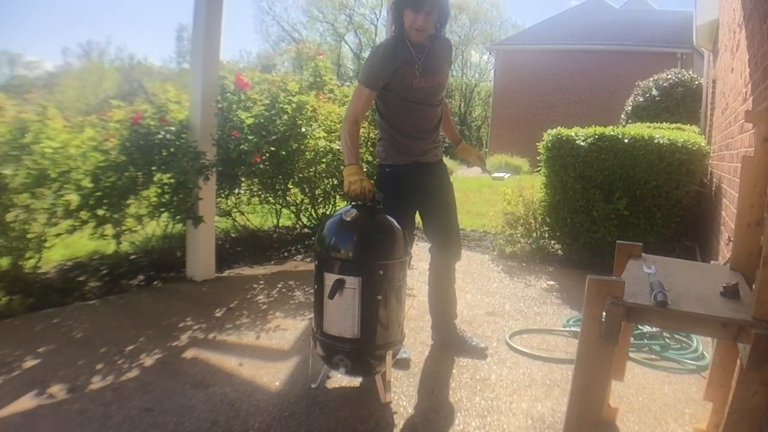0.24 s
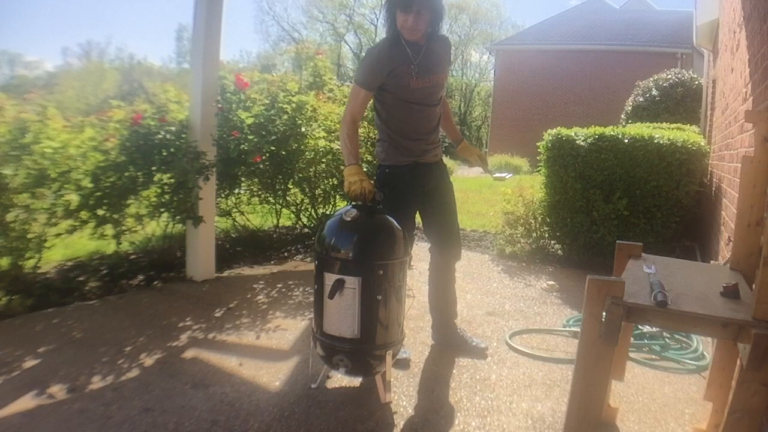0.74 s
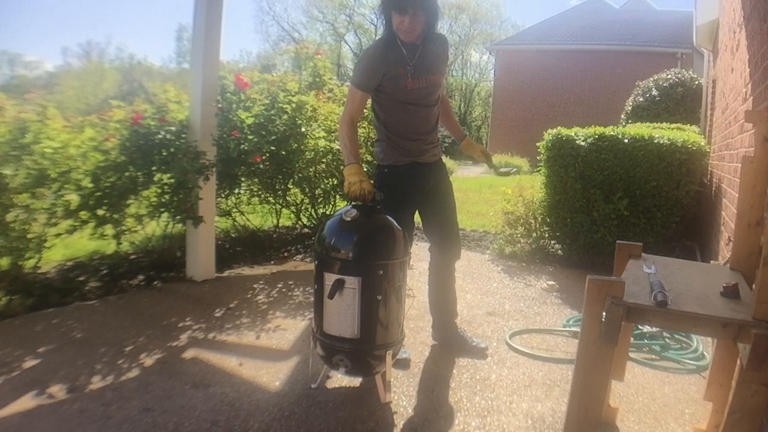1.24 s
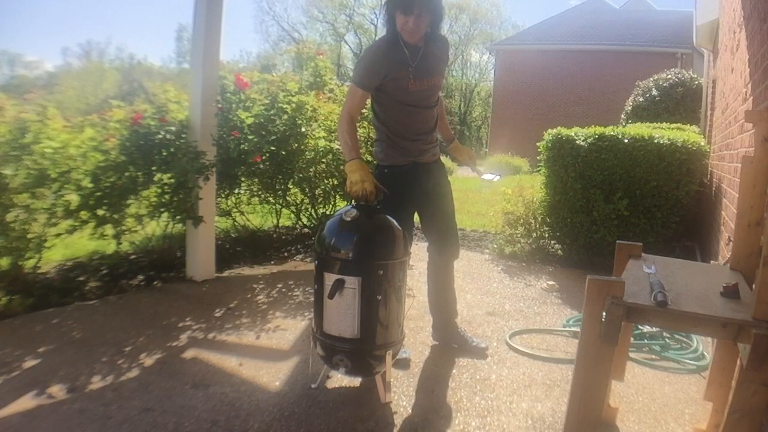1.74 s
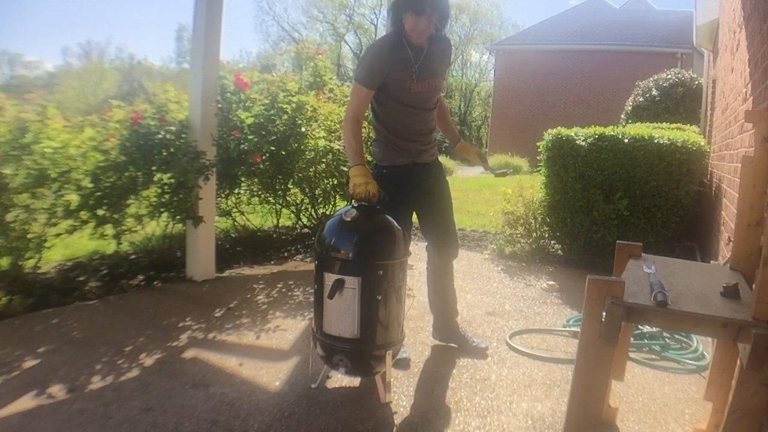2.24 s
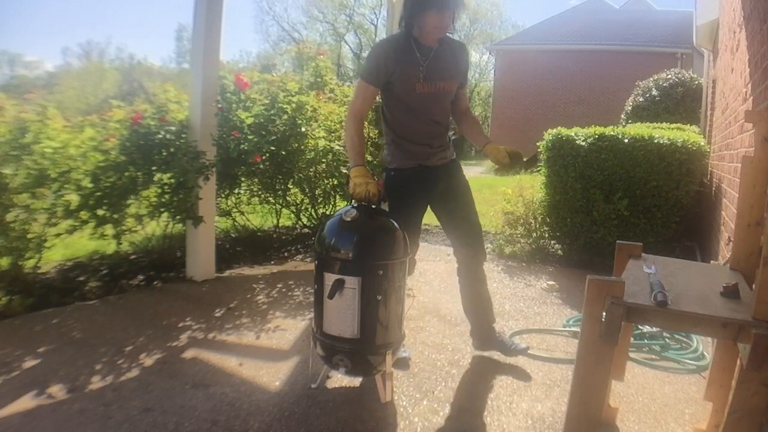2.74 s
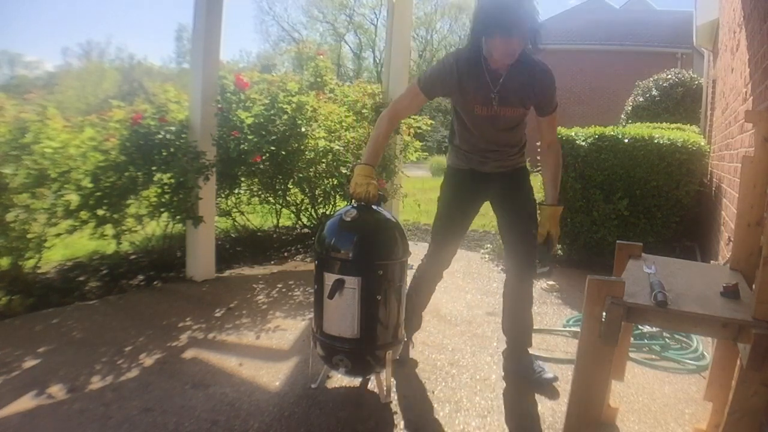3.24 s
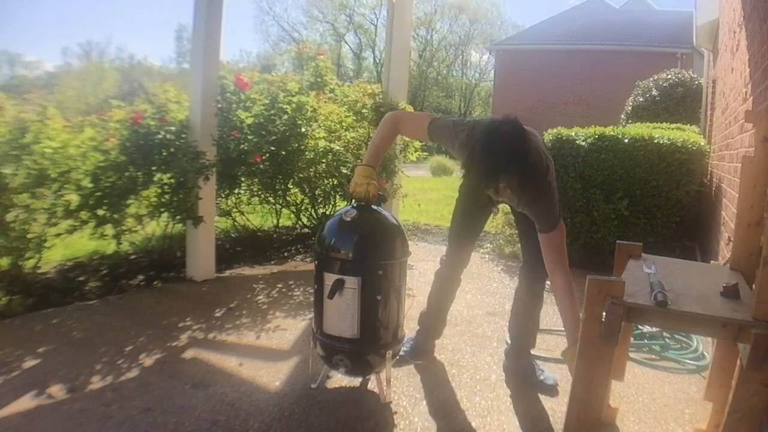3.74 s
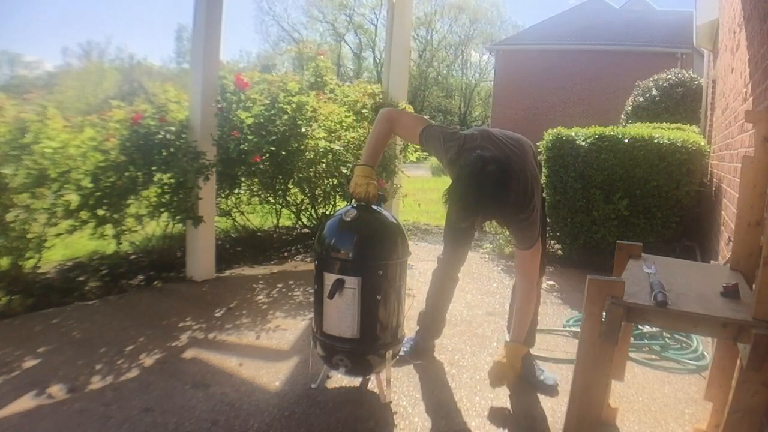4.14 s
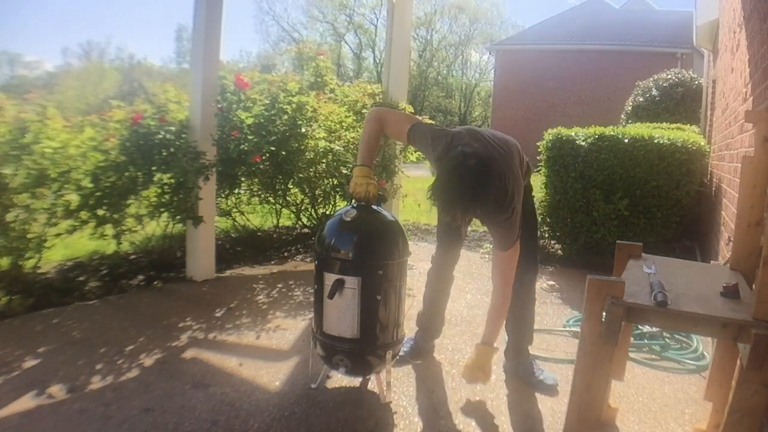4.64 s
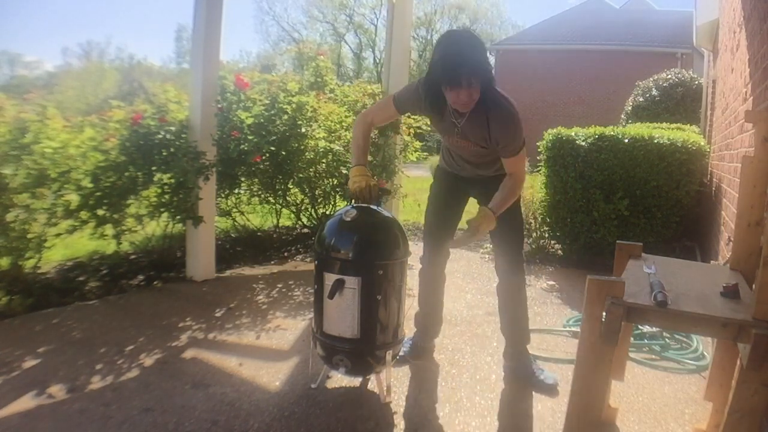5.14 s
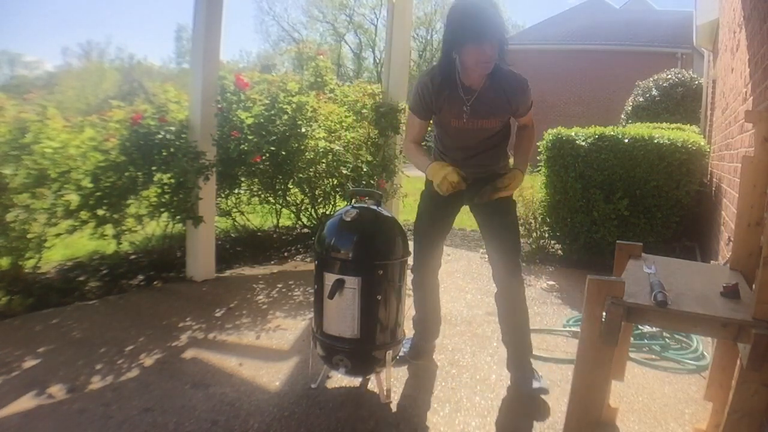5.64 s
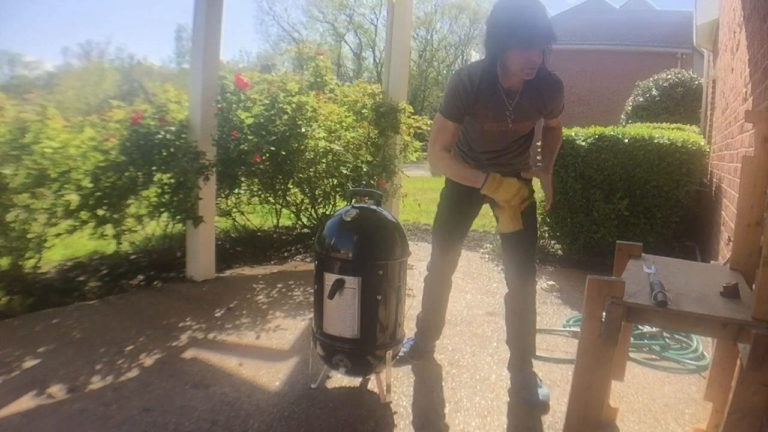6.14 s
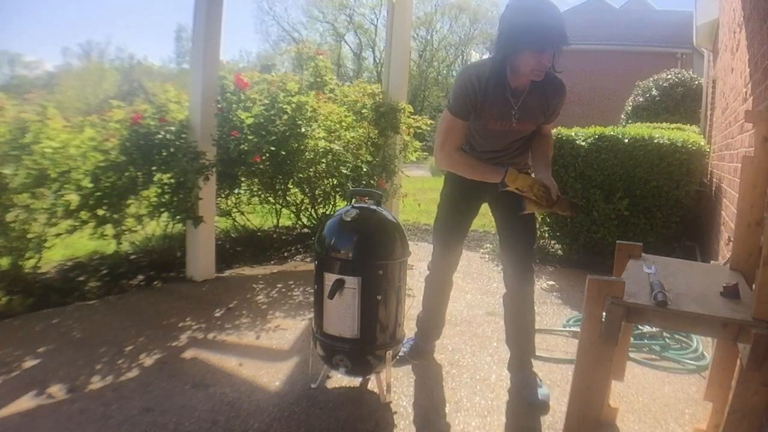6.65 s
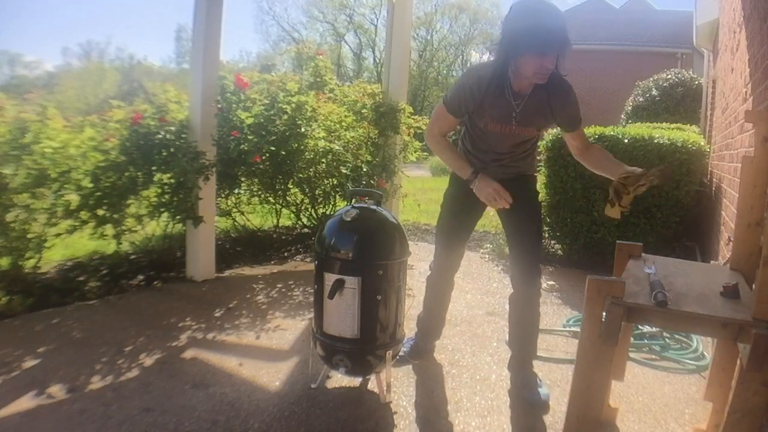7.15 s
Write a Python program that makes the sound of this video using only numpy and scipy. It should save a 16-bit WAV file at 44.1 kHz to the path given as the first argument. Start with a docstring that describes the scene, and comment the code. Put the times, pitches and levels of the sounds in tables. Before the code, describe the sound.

Outdoors on a covered patio, a low distant engine drone and soft air hiss run throughout. A dull foot thud comes early, then faint bird whistles. Around the middle a steel part of a charcoal smoker clanks sharply, bright and short, with a quick rattle. Birds chirp falling slurs afterward among faint glove and shoe scuffs. The microphone is fairly close, with short patio reflections.

```python
"""A soft outdoor hiss and the low drone of a far garden engine open the scene, with a faint fading whine.
Scuffs of shoes and gloves are friction grains; footfalls are a low push and a dull rumble.
Three birds sing in near sines: falling whistles, level pipes with a strong octave, and stepped slurs.
A steel part clanks on a charcoal smoker on a covered patio: noise cracks, ringing sheet modes and
hollow knocks, then a rattle of tiny contacts."""
import sys
import numpy as np
from scipy import signal
from scipy.fft import rfft, irfft
from scipy.io import wavfile
from scipy.ndimage import uniform_filter1d

SR = 44100
rng = np.random.default_rng(int(sys.argv[2]) if len(sys.argv) > 2 else 0)


def put_to_file(sound):
    """Save the sound as 16-bit audio at rate SR, in the file named by the first command-line argument."""
    columns = np.atleast_2d(sound).T  # one column per channel
    safe = np.clip(columns, -1, 1)
    whole_steps = np.round(safe * 32767)
    wavfile.write(sys.argv[1], SR, whole_steps.astype(np.int16))


N = 326295


def gain_of(db):
    """Decibels to a factor."""
    return 10 ** (np.asarray(db) / 20)


def evened(x):
    """Scales to rms 1."""
    return x / np.sqrt(np.mean(x ** 2) + 1e-20)


def coloured(x, points):
    """Filters x by a spectrum drawn on a log-frequency axis."""
    f, db = np.transpose(points)
    hz = np.fft.rfftfreq(len(x), 1 / SR)
    curve_db = np.interp(np.log(hz + 1), np.log(f + 1), db)
    return irfft(rfft(x) * gain_of(curve_db), len(x))


def add(mix, s, sound):
    """Mixes a sound in at s seconds, cut off at the end of the mix."""
    part = mix[round(s * SR):][:len(sound)]
    part += sound[:len(part)]


def resonate(x, hz, width_hz):
    """A resonance: shifts hz down to zero, smooths twice, and shifts back."""
    turn = np.exp(2j * np.pi * hz * np.arange(len(x)) / SR)
    r = np.exp(-np.pi * width_hz / SR)
    smooth = signal.lfilter([(1 - r) ** 2], [1, -2 * r, r * r], x / turn)
    return 2 * (turn * smooth).real


def drift(n, width_hz):
    """Random wander of rms 1: noise smoothed twice, faster for a larger width."""
    r = np.exp(-np.pi * width_hz / SR)
    return evened(signal.lfilter([1], [1, -2 * r, r * r], rng.standard_normal(n)))


def ring(modes, tilt_db, rise_s):
    """Dying sines in close pairs, since the shell is not quite round; each blow shares the energy anew."""
    t = np.arange(SR // 4) / SR
    partners = [(hz, db - 12.5, t60) for hz, db, t60 in modes]
    hz, db, t60 = np.transpose(modes + partners)[:, :, None]
    share, phase, split = rng.standard_normal((3, len(hz), 1))
    level_db = db + tilt_db * np.log2(hz / 2000) + 2 * share - 60 * t / t60
    sines = np.sin(2 * np.pi * (hz * (1 + 0.005 * split) * t + phase))
    return (gain_of(level_db) * sines).sum(0) * (1 - np.exp(-t / rise_s))


def echoes(t60, gap_s):
    """Sparse taps of random sign, dying away, energy 1."""
    at = np.arange(round(gap_s * SR), SR // 2, 20)
    taps = np.zeros(SR // 2 + 20)
    signs = rng.choice([-1., 1.], len(at))
    taps[at + rng.integers(0, 20, len(at))] = signs * gain_of(-60 * at / SR / t60)
    return taps / np.linalg.norm(taps)


# Colour of the outdoor air and microphone hiss. Each row: frequency in Hz, density in dB per Hz
# (only the shape counts).
AIR_COLOUR = [(25, -49), (45, -10), (70, -3), (125, -4.5), (190, -17), (260, -25.5), (500, -30),
              (1200, -30.5), (1500, -34.5), (3200, -37.5), (5000, -45), (6500, -42.5), (10500, -50.5),
              (12000, -49.5), (16000, -55.5)]
AIR_DB = -50  # rms level


def air():
    """Smooth noise of far traffic, leaves and the microphone."""
    return gain_of(AIR_DB) * evened(coloured(rng.standard_normal(N), AIR_COLOUR))


# The far engine's slow swells on the wind, before throb and fading.
# Each row: time in seconds, then second-, fourth- and eighth-order levels in dB.
DRONE_SWELLS = [(0, -52.5, -61, -57), (0.45, -56, -69, -67), (1, -57, -66, -69.5), (1.6, -53.5, -65, -76),
                (2.1, -53, -56, -66.5), (2.5, -51.5, -51, -68), (2.8, -52.5, -50, -62),
                (2.98, -51, -60, -58.5), (3.2, -50, -44.5, -57), (3.48, -52.5, -65, -61.5),
                (3.9, -48, -48.5, -62.5), (4.3, -54.5, -48, -59), (4.6, -47, -51.5, -65.5),
                (5.03, -52.5, -58, -67.5), (5.5, -45.5, -52.5, -62.5), (5.95, -46.5, -48.5, -62.5),
                (6.1, -55.5, -53.5, -71), (6.6, -46, -46.5, -65), (7, -48, -49, -62),
                (7.4, -48, -43, -71.5)]
# Weaker lines of the drone. Each row: frequency in Hz, level in dB, width in Hz.
WEAK_LINES = [(75.93, -56.5, 5.2), (91.6, -61, 21), (137.9, -56, 2.54), (163.8, -64, 2.55),
              (311.5, -78, 3.6), (344.4, -74, 4.8)]
ENGINE_HZ = 27.98
THROB_DB, THROB_HZ = 3.1, 17.4  # uneven firing
FADING_DB, FADING_HZ = 1.5, 2.7  # moving air makes each order fade in and out
# A tone just above the eighth order beats against it.
BEAT_HZ, BEAT_START_S, BEAT_SHARE = 5.9, 2.7, 0.74  # BEAT_START_S only sets the phase of the beat


def engine():
    """Orders of the firing rate; distance and wind blur each into a wavering line."""
    t = np.arange(N) / SR
    s, *levels_db = np.transpose(DRONE_SWELLS)
    turns = ENGINE_HZ * t + 0.018 * drift(N, 2.13)
    tones = [np.exp(2j * np.pi * order * turns) for order in (2, 4, 8)]
    beat = np.exp(2j * np.pi * BEAT_HZ * (t - BEAT_START_S))
    tones[2] = tones[2] * (1 + BEAT_SHARE * beat)
    out = np.zeros(N)
    for tone, db in zip(tones, levels_db):
        throb_db = THROB_DB * drift(N, THROB_HZ)
        fading_db = FADING_DB * drift(N, FADING_HZ)
        out += gain_of(np.interp(t, s, db) + throb_db + fading_db) * evened(tone.real)
    for hz, db, width_hz in WEAK_LINES:
        out += gain_of(db) * evened(resonate(rng.standard_normal(N), hz, width_hz))
    return out


WHINE_HZ, WHINE_WIDTH_HZ, WHINE_DB, WHINE_PULSE_DB = 1785, 114, -70, 1.6
WHINE_RISE_S, WHINE_HOLD_S, WHINE_FADE_DB_PER_S = 0.084, 0.82, 13  # the fade starts at WHINE_HOLD_S


def whine():
    """A narrow band of noise that swells in, pulses unevenly and dies out."""
    t = np.arange(N) / SR
    fade_db = WHINE_FADE_DB_PER_S * np.maximum(t - WHINE_HOLD_S, 0)
    level_db = WHINE_DB - fade_db + WHINE_PULSE_DB * drift(N, 25)
    band = evened(resonate(rng.standard_normal(N), WHINE_HZ, WHINE_WIDTH_HZ))
    return np.minimum(t / WHINE_RISE_S, 1) * gain_of(level_db) * band


# Scuffs of shoes and gloves.
# Each row: start in seconds, length in seconds, level in dB, centre in Hz, hiss level in dB.
SCUFF_MOVES = [(0.055, 0.2, -66, 2480, -82), (0.159, 0.11, -61, 2050, -88), (.2, 0.077, -66, 1120, -87),
               (3.313, 0.032, -62, 2040, -77), (4.53, 0.043, -57, 1090, -80),
               (5.195, 0.17, -64, 2360, -79.5), (5.459, 0.063, -54, 1210, -74.5),
               (5.523, 0.092, -61, 2340, -74.5), (5.595, 0.045, -58.5, 1280, -76),
               (5.916, 0.053, -61, 1960, -84), (6.005, 0.074, -57.5, 1810, -73),
               (6.306, 0.12, -67, 1720, -88), (6.537, 0.029, -61.5, 1190, -83),
               (6.601, 0.049, -50, 1430, -83), (6.609, 0.036, -64, 2980, -80),
               (6.948, 0.067, -55.5, 1610, -73.5), (6.962, 0.056, -62, 2600, -72),
               (7, 0.058, -55.5, 1600, -68.5), (7.038, 0.065, -57.5, 1910, -71)]
SCUFF_WIDTH = 0.67  # share of the centre frequency


def scuffs():
    """Clumped grains of friction through a broad resonance, with a hiss on top."""
    out = np.zeros(N)
    for s, length, db, hz, hiss_db in SCUFF_MOVES:
        n = round(length * SR)
        clumps_db = 3.4 * evened(uniform_filter1d(rng.standard_normal(n), 150))
        grains = rng.standard_normal(n) * gain_of(clumps_db)
        rub = evened(resonate(grains, hz, SCUFF_WIDTH * hz))
        hiss = evened(resonate(rng.standard_normal(n), 7400, 7000))
        sound = gain_of(db) * rub + gain_of(hiss_db) * hiss
        add(out, s, sound * signal.windows.tukey(n, 0.6))
    return out


# Footfalls on the slab. Each row: start in seconds, push level in dB, rumble level in dB, pitch in Hz.
FOOTFALLS = [(0.141, -60, -46, 140), (.19, -47, -38, 150), (.222, -44, -58, 160),
             (.3225, -29.5, -32.5, 171), (.335, -42.5, -55, 625), (.565, -42, -42, 239),
             (0.584, -37, -46, 146), (0.794, -48, -50, 190), (3.039, -45, -43.5, 237),
             (5.3, -63, -51.5, 443), (5.599, -51, -46, 358), (6.031, -54.5, -54, 397),
             (6.635, -40.5, -48, 364), (7.049, -69, -54, 446)]
RUMBLE_T60 = 0.11  # s


def steps():
    """A low push, then a dull rumble of sole and slab."""
    out, t = np.zeros(N), np.arange(SR // 4) / SR
    for s, push_db, rumble_db, hz in FOOTFALLS:
        bump = np.exp(-((t * hz - 1) / 0.94) ** 2)  # peaks one cycle after the start
        push = -np.cos(2 * np.pi * (hz * t - 1)) * bump * np.minimum(2 * t * hz, 1)
        rumble = evened(resonate(rng.standard_normal(len(t)), hz, 1.3 * hz))
        rumble = rumble * gain_of(-60 * t / RUMBLE_T60) * np.minimum(t / 0.02, 1)
        add(out, s, gain_of(push_db) * push + gain_of(rumble_db) * rumble)
    return out


def birds():
    """Three singers together; moving air makes them flutter."""
    return (whistles() + pipes() + slurs()) * gain_of(2.7 * drift(N, 200))


# Short whistles. Each row: start in seconds, length in seconds, start pitch in Hz, end pitch in Hz,
# mid-note level in dB.
WHISTLE_NOTES = [(1.64, .07, 2150, 2060, -74), (1.975, 0.067, 2210, 1960, -71),
                 (2.304, 0.067, 2210, 2010, -71), (2.828, 0.085, 2570, 2080, -64),
                 (3.343, 0.084, 2660, 2020, -61), (3.876, 0.065, 2390, 2100, -59.5),
                 (4.34, 0.086, 2630, 2055, -57.5), (4.604, 0.012, 2910, 2640, -61),
                 (4.622, 0.029, 2040, 1870, -64.5), (5.037, 0.18, 2450, 2360, -74),
                 (5.72, 0.028, 2260, 2115, -68), (5.823, 0.052, 2420, 2330, -68),
                 (6.12, 0.036, 2100, 2186, -69.5), (6.285, 0.041, 2300, 2160, -69),
                 (6.4, 0.15, 2240, 2170, -72), (6.55, 0.094, 2200, 2135, -70),
                 (6.675, 0.036, 2530, 2480, -72)]
SWELL_DB_PER_HZ = 0.0418  # the further a whistle falls, the more it swells


def whistles():
    """Near sines whose pitch glides fast at first, then settles."""
    out = np.zeros(N)
    for s, length, start_hz, end_hz, db in WHISTLE_NOTES:
        u = np.linspace(0, 1, round(length * SR))
        waver = 1 + 0.012 * drift(len(u), 80)
        hz = end_hz + (start_hz - end_hz) * (1 - u) ** 1.9
        phase = 2 * np.pi * np.cumsum(waver * hz) / SR
        swell_db = SWELL_DB_PER_HZ * (start_hz - end_hz) * (u - 0.5)
        level = np.sqrt(2) * gain_of(db + swell_db) * signal.windows.tukey(len(u), 0.4)
        add(out, s, level * np.sin(phase))
    return out


# Level notes of a bird with a strong octave.
# Each row: start in seconds, pitch in Hz, level in dB, octave level in dB.
PIPE_NOTES = [(2.31, 1664, -69, -75.5), (2.421, 1586, -79, -71.5), (2.615, 1640, -68.5, -74),
              (2.726, 1573, -72, -75.5), (3.702, 1676, -71.5, -87), (4.5, 1664, -63, -69),
              (4.585, 1590, -78.5, -71), (4.85, 1680, -72, -71), (4.971, 1590, -70, -76.5)]
PIPE_S = 0.085


def pipes():
    """Level, slightly wavering sines, each with its octave."""
    out = np.zeros(N)
    for s, hz, db, octave_db in PIPE_NOTES:
        waver = 1 + 0.012 * drift(round(PIPE_S * SR), 60)
        phase = 2 * np.pi * hz * np.cumsum(waver) / SR
        note = gain_of(db) * np.sin(phase) + gain_of(octave_db) * np.sin(2 * phase)
        add(out, s, np.sqrt(2) * note * signal.windows.tukey(len(phase), 0.4))
    return out


# Blows on the steel. Each row: start in seconds, ring level in dB, crack level in dB,
# hollow knock level in dB, brightness in dB per octave.
BLOW_HITS = [(3.151, -56, -50.5, -75, 2.5), (3.9432, -40, -27, -36, 9.5), (3.946, -55.5, -34, -36, -10),
             (3.9921, -28.5, -8, -51, 0.5), (3.9963, -34, -30.5, -54, -4.5), (4.011, -38, -45, -46, 4),
             (4.0466, -41.5, -55, -45.5, -12), (4.073, -58, -42, -52, 13), (4.1005, -47, -52, -58, -4),
             (4.1288, -49, -40, -55.5, -6.5), (4.159, -52, -53, -77.5, 3), (4.163, -43, -37, -64, 1),
             (4.168, -41, -36, -43, 8), (4.184, -44, -55, -63, -3), (4.2, -67, -64, -72, -2),
             (4.217, -70, -64, -70, 0), (4.265, -83, -67, -64.5, -5)]
# Modes of the sheet steel. Each row: frequency in Hz, relative level in dB, t60 in seconds.
SHEET_MODES = [(800, -64, 0.048), (905, -20.5, 0.065), (1140, -4, 0.035), (1370, -29, 0.023),
               (1607, 6, 0.025), (1610, -6.5, 0.076), (1790, -7.5, 0.049), (1950, 5.5, 0.056),
               (2103, 6, 0.054), (2178, 2.5, 0.061), (2380, -12.5, 0.065), (2346, 4, 0.067),
               (2816, -6, 0.057), (2750, -19, .06), (3040, -12, 0.039), (3420, -18, 0.012),
               (4480, -14, 0.027), (4900, -21.5, .05), (6130, -20, .04), (7200, -30, 0.0264),
               (8060, -26, .06)]
# Colour of the crack. Each row: frequency in Hz, density in dB per Hz (only the shape counts).
CRACK_COLOUR = [(300, -24.5), (600, -2.5), (1100, -13.5), (2100, 2), (2800, -7), (3600, 7), (4300, 0),
                (5000, -15), (6100, -7), (7200, -7.5), (9000, -18), (13500, -31), (16000, -44)]
# Modes of the hollow body. Each row: frequency in Hz, relative level in dB, t60 in seconds.
BODY_MODES = [(164, -4, 0.21), (298, -1, 0.075), (363, 6.5, 0.034), (554, 0, 0.035), (752, -1.5, 0.032),
              (1060, -10, 0.037), (1377, 6.5, 0.019)]
CRACK_S = 0.0024  # decay time constant


def steel():
    """Each blow: a noisy crack, the ringing sheet and the knock of the hollow body."""
    out, t = np.zeros(N), np.arange(2048) / SR
    for s, ring_db, crack_db, knock_db, tilt_db in BLOW_HITS:
        # soft contacts are dull
        colour = [(hz, db + tilt_db * np.log2(hz / 2000)) for hz, db in CRACK_COLOUR]
        crack = evened(coloured(rng.standard_normal(2048), colour))
        crack = crack * np.exp(-t / CRACK_S) * np.minimum(t / 0.0005, 1)
        add(out, s, gain_of(crack_db) * crack)
        add(out, s, gain_of(ring_db) * ring(SHEET_MODES, tilt_db, rise_s=0.00054))
        add(out, s, gain_of(knock_db) * ring(BODY_MODES, 0, rise_s=0.00027))
    return out


# From LOOSE_S on, each blow leaves the loose part chattering.
LOOSE_S, CHATTER_T60, CONTACTS_PER_S = 3.99, 0.14, 410
CHATTER_DB, CHATTER_SHARE = -28.5, 0.39  # the share of a blow's ring dB is added to CHATTER_DB


def rattle():
    """Many tiny uneven contacts keep the sheet modes going; harder blows start somewhat louder chatter."""
    out, t = np.zeros(N), np.arange(SR // 3) / SR + LOOSE_S
    power = np.zeros(len(t))
    for s, ring_db, *_ in BLOW_HITS:
        if s >= LOOSE_S:
            chatter_db = CHATTER_DB + CHATTER_SHARE * ring_db - 60 * abs(t - s) / CHATTER_T60
            power += (t >= s) * gain_of(chatter_db) ** 2
    contacts = rng.standard_normal(len(t)) * (rng.random(len(t)) < CONTACTS_PER_S / SR)
    sheet = np.zeros(len(t))
    for hz, mode_db, t60 in SHEET_MODES:
        mode_gain = gain_of(mode_db - 2.5 * np.log2(hz / 2000))
        sheet += mode_gain * evened(resonate(contacts, hz, 5.8 / t60))
    add(out, LOOSE_S, np.sqrt(power) * evened(sheet))
    return out


# Falling slurs. Each row: start in seconds, level in dB, lean to the high notes in dB per octave.
SLUR_CALLS = [(4.86, -59, -6.5), (5.15, -51.5, -2), (5.446, -49.5, -3), (5.744, -57, 1)]
# One slur, sung as four stepped notes. Each row: seconds after its start, length in seconds,
# start pitch in Hz, end pitch in Hz, relative level in dB.
SLUR_NOTES = [(0, 0.022, 4140, 3900, -11.5), (0.015, 0.0244, 3595, 3000, -7), (.034, .024, 2850, 2517, 0.5),
              (.06, .07, 2120, 1652, -7.5)]


def slurs():
    """Each slur steps down through its four husky notes."""
    out = np.zeros(N)
    for s, db, lean_db in SLUR_CALLS:
        for after, length, start_hz, end_hz, note_db in SLUR_NOTES:
            u = np.linspace(0, 1, round(length * SR))
            hz = end_hz + (start_hz - end_hz) * (1 - u) ** 1.61
            husk = 1 + 0.031 * drift(len(u), 470)  # an unsteady throat
            level = gain_of(db + note_db + lean_db * np.log2(hz / 2600))
            level = np.sqrt(2) * level * signal.windows.tukey(len(u), 0.8)
            add(out, s + after, level * np.sin(2 * np.pi * np.cumsum(hz * husk) / SR))
    return out


# Colour of the patio echoes. Each row: frequency in Hz, gain in dB.
PATIO_COLOUR = [(100, 2), (700, 4.5), (2000, 3), (4000, -5), (6000, -2.5), (7500, -0.5), (12000, 2)]


def scene():
    """Near sounds bounce under the patio roof; bird song echoes off the houses."""
    near, song = scuffs() + steps() + steel() + rattle(), birds()
    bounces = signal.fftconvolve(near, echoes(t60=0.18, gap_s=0.004))[:N]
    patio = gain_of(-9.5) * coloured(bounces, PATIO_COLOUR)
    close = gain_of(-4) * signal.fftconvolve(song, echoes(t60=0.1, gap_s=0.002))[:N]
    houses = gain_of(-12) * signal.fftconvolve(song, echoes(t60=0.8, gap_s=0.03))[:N]
    return (air() + engine() + whine() + near + patio + song + close + houses)[None]


EDGE_HZ = 15800


def record(dry):
    """A steep low-pass closes the top of the band at EDGE_HZ."""
    low_pass = signal.firwin(511, EDGE_HZ, window=("kaiser", 9), fs=SR)
    return signal.oaconvolve(dry, low_pass[None], "same")


dry = scene()
out = record(dry)
put_to_file(out)
```